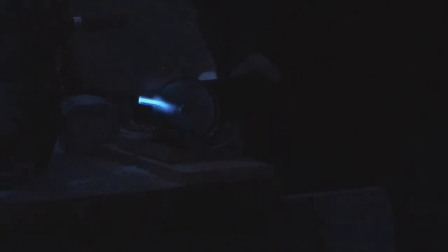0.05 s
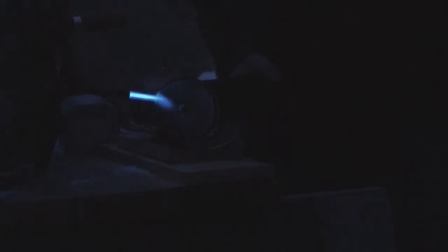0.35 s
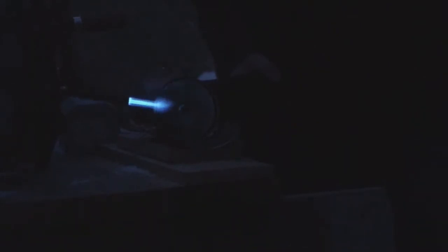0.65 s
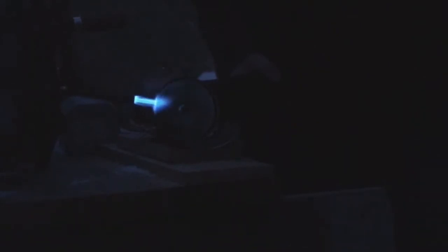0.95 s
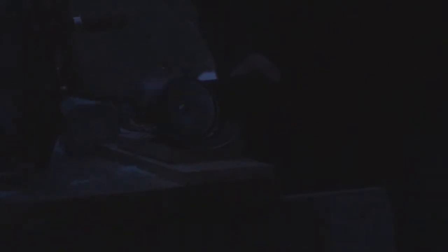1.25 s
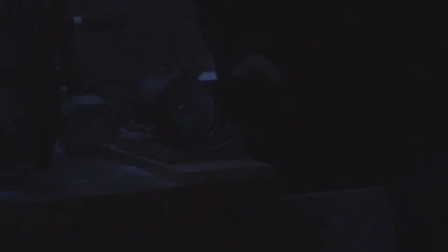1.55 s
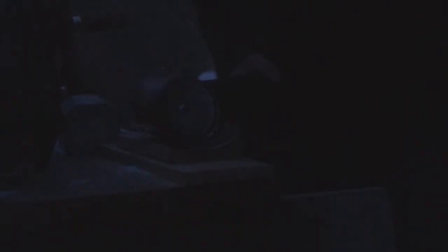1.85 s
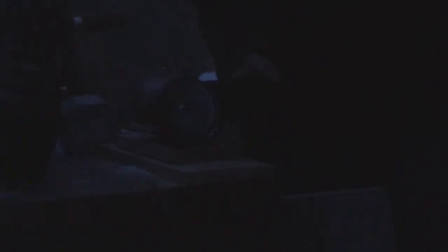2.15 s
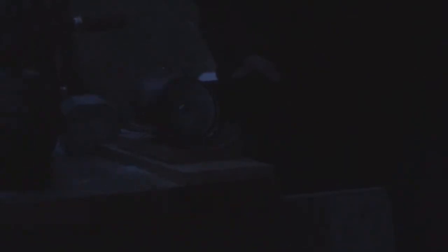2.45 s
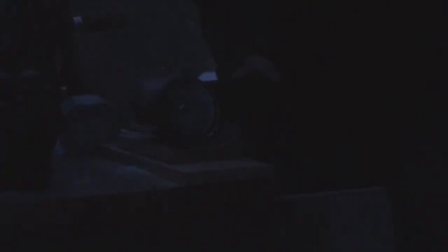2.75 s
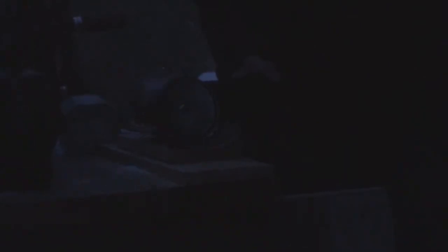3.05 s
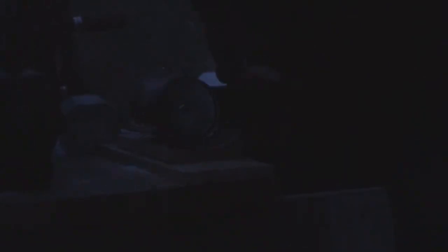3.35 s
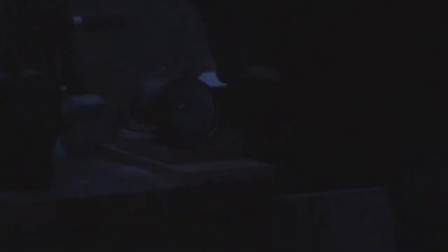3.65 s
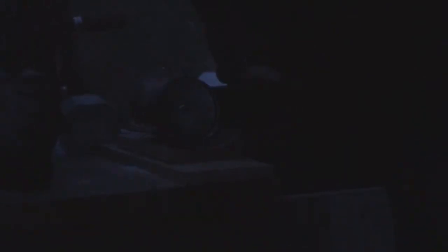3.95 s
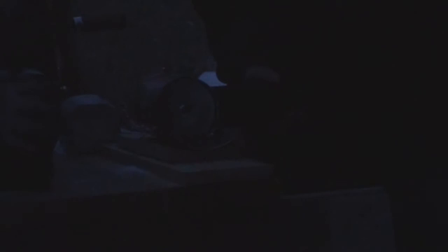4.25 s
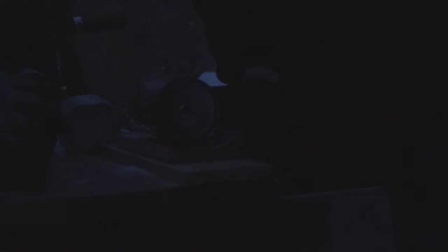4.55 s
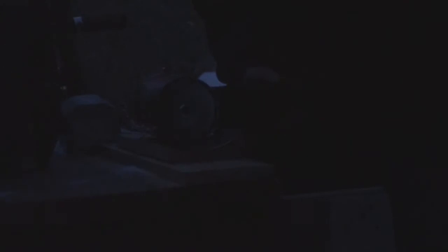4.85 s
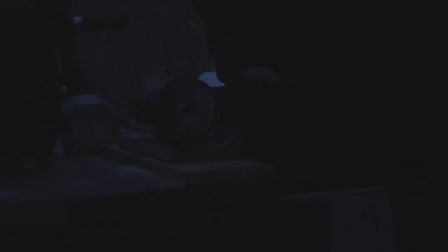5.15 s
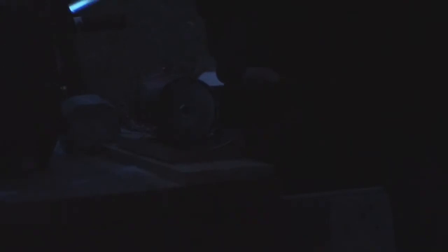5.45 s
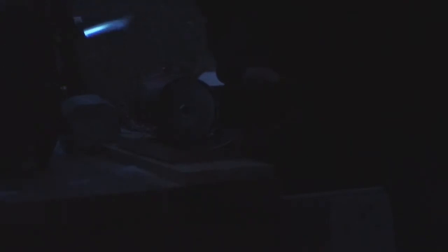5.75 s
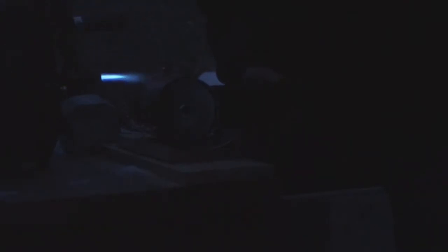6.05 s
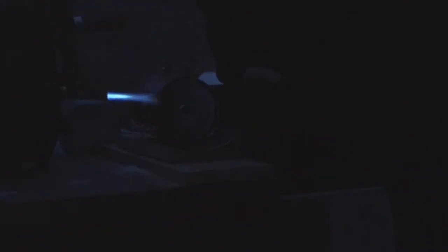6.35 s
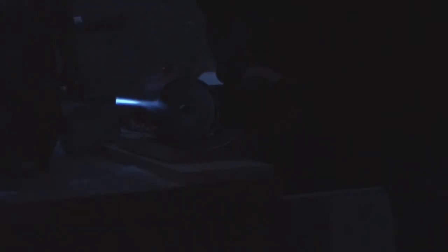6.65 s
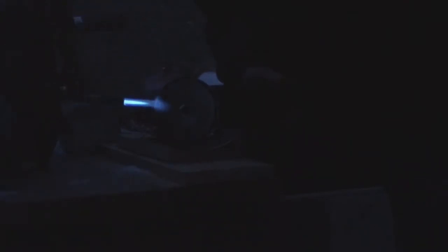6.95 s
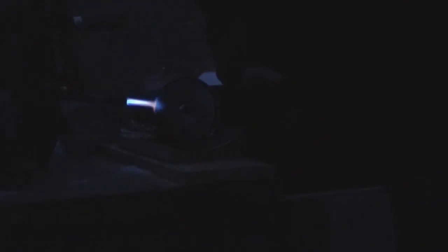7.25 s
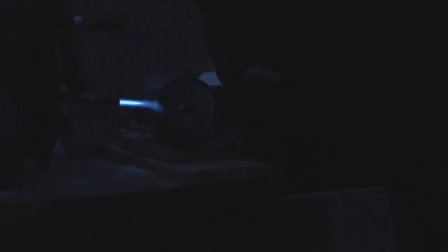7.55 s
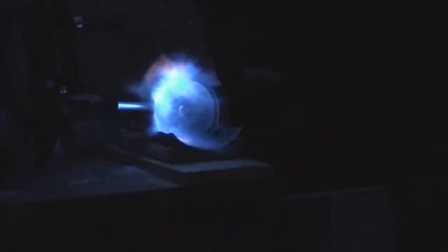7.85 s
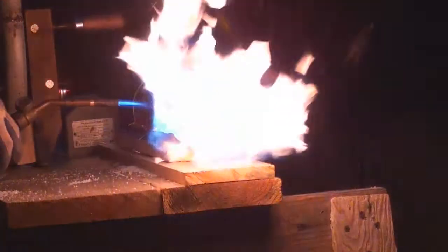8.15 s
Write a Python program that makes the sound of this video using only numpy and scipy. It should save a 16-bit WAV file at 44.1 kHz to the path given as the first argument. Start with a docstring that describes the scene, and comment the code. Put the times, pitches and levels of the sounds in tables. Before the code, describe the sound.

An electric blower whines up three times, driving a loud rush of air over hissing gas and a blowtorch, ending in a low fireball puff.

```python
"""A fuel gas jet hisses and whistles over a burning blowtorch: a homemade turbine in a small workshop.
An electric blower runs up three times, whining and driving air through resonant ducts and the combustor.
In the lull after the first run the gas valve shuts and metal is knocked, once sharply. The gas flows
again with a short hoot; at the end it catches in a fireball. The torch burns throughout."""
import sys
import numpy as np
from scipy import signal
from scipy.fft import rfft, irfft
from scipy.io import wavfile
from scipy.ndimage import uniform_filter1d

SR = 44100
rng = np.random.default_rng(int(sys.argv[2]) if len(sys.argv) > 2 else 0)


def master_out(mix):
    """Clip the mix to full scale and print it as 16-bit PCM to the path in sys.argv[1]."""
    frames = np.transpose(np.atleast_2d(mix))
    ceiling = np.clip(frames, -1, 1)
    pcm = np.round(ceiling * 32767).astype(np.int16)
    wavfile.write(sys.argv[1], SR, pcm)


N = 362061
T = np.arange(N) / SR
F = np.maximum(np.arange(N // 2 + 1) * SR / N, 1)
START_HZ, FULL_SPEED_HZ = 134, 218  # shaft rates


def undb(db):
    """Decibels to gain."""
    return 10 ** (np.asarray(db) / 20)


def unit(x):
    """Scale to rms 1."""
    return x / np.sqrt(np.mean(x ** 2))


def ramp(start_s, length_s):
    """Linear rise from 0 to 1."""
    return np.clip((T - start_s) / length_s, 0, 1)


def bump(peak_s, half_s):
    """Gaussian envelope, peak 1."""
    return np.exp(-((T - peak_s) / half_s) ** 2)


def bell(x, centre, width):
    """Resonance curve, peak 1, full width at half height."""
    return 1 / (1 + (2 * (x - centre) / width) ** 2)


def spectrum_db(points):
    """Breakpoints interpolated over log frequency."""
    hz, db = np.transpose(points)
    return np.interp(np.log(F), np.log(hz), db)


def resonance_db(resonances):
    """Summed lift of resonances at every frequency."""
    return sum(db * bell(F, hz, width_hz) for hz, width_hz, db in resonances)


def colour(x, db):
    """Filter by a gain at every frequency."""
    return irfft(rfft(x) * undb(db), N)


def band_noise(hz, width_hz):
    """Noise through one resonance, rms 1."""
    return unit(colour(rng.standard_normal(N), 20 * np.log10(bell(F, hz, width_hz))))


def walk(rate_hz):
    """Smooth random drift, rms 1."""
    hold = max(int(SR / rate_hz), 1)
    steps = np.repeat(rng.standard_normal(N // hold + 1), hold)
    return unit(uniform_filter1d(uniform_filter1d(steps, hold), hold)[:N])


def eddies(shape_db, flutter_db, grit_db):
    """Turbulence, rms 1: slow flutter and millisecond grit move all bands together."""
    bursts = undb(flutter_db * (walk(14) + walk(60)) + grit_db * walk(900))
    return unit(colour(rng.standard_normal(N) * bursts, shape_db))


def tone(hz, rough, shake_hz=70):
    """A partial of rms 1, its strength and phase shaken by the flow."""
    shake = 1 + rough * (walk(shake_hz) + 1j * walk(shake_hz))
    return unit(np.real(shake * np.exp(2j * np.pi * np.cumsum(hz) / SR)))


# blower runs (on [s], off [s], air trim at switch-off [dB], hiss lift and body cut at switch-off [dB])
BLOWER_RUNS = [(.452, 1.899, 1.0, -0.44), (4.892, 5.968, 1, 0.4), (6.799, 7.469, 0.86, -0.5)]


def shaft_rate(limit_hz=223.5, run_up_s=.325, drag_turns=242, friction_hz=55):
    """Constant power fills the rotor with energy against drag; switched off, air and bearings brake it."""
    def coast(hz, t):
        return friction_hz * np.tan(np.arctan(hz / friction_hz) - t * friction_hz / drag_turns)
    shaft_hz = coast(START_HZ, np.minimum(T, BLOWER_RUNS[0][0]))
    for on_s, off_s, _, _ in BLOWER_RUNS:
        on, off = int(on_s * SR), int(off_s * SR)
        energy_gap = (limit_hz ** 2 - shaft_hz[on] ** 2) * np.exp(-T[:N - on] / run_up_s)
        shaft_hz[on:] = np.sqrt(limit_hz ** 2 - energy_gap)
        shaft_hz[off:] = coast(shaft_hz[off], T[:N - off])
    return shaft_hz


# air stream spectrum (frequency [Hz], level [dB])
AIR_SPECTRUM = [(30, -47), (60, -26), (130, -23), (300, -15.5), (500, -6.5), (1100, -7), (2000, -4),
                (3600, -3), (5500, 0.5), (7500, -5), (10000, -7), (12000, -15), (14000, -22.5),
                (16000, -23.0)]
# duct and combustor resonances (frequency [Hz], width [Hz], lift [dB])
DUCT_MODES = [(178, 41, 7.5), (273, 100, 8.5), (385, 18, 4.5), (518, 103, 3.1), (626.5, 69, 9),
              (752, 96, 8), (835, 50, 4.5), (928, 118, 10.5), (1050, 77, 5.5), (1227, 100, 7),
              (1341, 45, 5), (1388, 156, 7), (1580, 300, 6.5), (1914, 200, 7.5), (2070, 53, 3),
              (2126, 158, 8.5), (2593, 335, 5.5), (2783, 205, 3.5), (3300, 89, 4), (6600, 1300, 1.8)]


def air_stream(shaft_hz, level_db=-27.5, db_per_decade=58):
    """Duct rush grows with about the sixth power of blower speed, the hiss faster than the body."""
    _, off_s, trims_db, tilts_db = np.transpose(BLOWER_RUNS)
    trim_db, tilt_db = np.interp(T, off_s, trims_db), np.interp(T, off_s, tilts_db)
    decades = np.log10(shaft_hz / FULL_SPEED_HZ)
    rush = eddies(spectrum_db(AIR_SPECTRUM) + resonance_db(DUCT_MODES), flutter_db=.07, grit_db=.23)
    hiss = signal.sosfilt(signal.butter(1, 3000, "high", fs=SR, output="sos"), rush)
    body = rush - hiss
    stream = body * undb(-6 * decades - tilt_db) + hiss * undb(14 * decades + tilt_db)
    return stream * undb(level_db + db_per_decade * decades + trim_db)


# fan housing resonances (frequency [Hz], width [Hz], lift [dB])
HOUSING_MODES = [(1320, 70, 5), (1620, 100, 6.5), (1785, 40, 6.5), (1950, 60, 10.5), (2172, 40, 5.5)]
# unbalance and blade overtones (order [x shaft rate], level at full speed [dB])
FAN_ORDERS = [(1, -53.5), (20, -60), (60, -63)]


def blower(shaft_hz, blades=10, blade_db=-45.5, cut_on_hz=1390, overtone_db_per_decade=62):
    """The blade note flares at each housing resonance and dies below the duct's cut-on."""
    blade_hz = blades * shaft_hz
    housing = undb(np.interp(blade_hz, F, resonance_db(HOUSING_MODES)))
    escape = 1 / np.sqrt(1 + (cut_on_hz / blade_hz) ** 20)
    note = tone(blade_hz, rough=.36, shake_hz=45) * undb(blade_db) * housing * escape
    overtones = sum(undb(db) * tone(order * shaft_hz, rough=.34) for order, db in FAN_ORDERS)
    return note + overtones * undb(overtone_db_per_decade * np.log10(shaft_hz / FULL_SPEED_HZ))


# motor tones (order [x shaft rate], casing resonance [Hz], width [Hz], peak level [dB])
MOTOR_ORDERS = [(12, 2080, 280, -37), (24, 2250, 400, -45.5), (24, 3080, 350, -44.5)]


def motor(shaft_hz, full_pull_hz_per_s=170):
    """The armature rasps under power, each tone heard where it crosses a casing resonance."""
    acceleration = uniform_filter1d(np.gradient(shaft_hz) * SR, size=1500)
    pull = np.clip(acceleration / full_pull_hz_per_s, 0, 1)
    rasp = 0
    for order, casing_hz, width_hz, db in MOTOR_ORDERS:
        hz = order * shaft_hz
        rasp += undb(db) * tone(hz, rough=2.1, shake_hz=190.8) * bell(hz, casing_hz, width_hz)
    return rasp * pull


# gas jet spectrum (frequency [Hz], level [dB])
GAS_SPECTRUM = [(30, -17), (60, -2.5), (110, -13.5), (300, -7), (550, 1.5), (1100, -6), (2600, -2.5),
                (3200, -3), (4500, -3), (6000, -4), (10000, -10), (13000, -19), (16000, -29.0)]
# fuel valve (opens [s], shuts [s], opening time [s], flow [dB], whistle trim on opening [dB])
FUEL_VALVE = [(-.5, 3.343, .1, -1.0, 1), (3.352, 3.395, .01, -16, -10), (4.84, 8.5, .13, -2.5, -7)]


def gas_jet(shaft_hz, hiss_db=-39, draught_db_per_decade=5, whistle_db=-50, growth_db_per_s=.5):
    """Gas hisses into the combustor, louder in a strong draught; its nozzle gives a breathy whistle."""
    flow, whistle_drive = 0, 0
    for open_s, shut_s, opening_s, flow_db, trim_db in FUEL_VALVE:
        valve = ramp(open_s, opening_s) * (1 - ramp(shut_s, .0055))
        flow += valve * undb(flow_db)
        whistle_drive += valve * undb(flow_db + trim_db + growth_db_per_s * (T - open_s))
    throat_db = 3 * bell(F, 630, 50)
    shape_db = spectrum_db(GAS_SPECTRUM) + resonance_db(DUCT_MODES) + throat_db
    hiss = flow * eddies(shape_db, flutter_db=.64, grit_db=1.5)
    whistle = whistle_drive * band_noise(4735, width_hz=100) * undb(walk(25.1))
    draught_db = draught_db_per_decade * np.log10(shaft_hz / START_HZ)
    return hiss * undb(hiss_db + draught_db) + whistle * undb(whistle_db)


# fireball spectrum (frequency [Hz], level [dB])
FIRE_SPECTRUM = [(25, -20), (55, -6), (105, -5.5), (160, 6), (210, -1), (290, -8.5), (380, -4.5), (600, -8),
                 (900, -27), (2000, -44), (8000, -45)]
# fireball flares (time [s], relative level [dB])
FIRE_FLARES = [(7.975, -3), (8.088, -4), (8.17, -10), (8.205, -13)]


def fireball(level_db=-38, ignition_s=7.948, spread_s=.035, puff_s=3.32, puff_db=-49):
    """Flame billows in low, uneven puffs: softly as the valve shuts, fully when the gas catches."""
    billow = eddies(spectrum_db(FIRE_SPECTRUM), flutter_db=.8, grit_db=.2)
    burn = undb(-1) * ramp(ignition_s, spread_s)
    flares = sum(undb(db) * bump(peak_s, half_s=.02) for peak_s, db in FIRE_FLARES)
    puff = band_noise(110, width_hz=140) * bump(puff_s, half_s=.037)
    return billow * (burn + flares) * undb(level_db) + puff * undb(puff_db)


# knocks on the metalwork (time [s], relative level [dB])
KNOCK_HITS = [(3.387, -21), (3.995, -14.5), (4.1958, -10), (4.1995, -1), (4.647, -17)]
# metalwork modes (frequency [Hz], relative level [dB], t60 [s])
METAL_MODES = [(1090, -7, 0.14), (1420, -2, .06), (1624, 7, 0.047), (2090, -5, .1), (2580, -8, 0.067),
               (3300, -12, .05), (4100, -10, 0.04), (4800, -9, .1), (5200, -4, 0.047), (5350, -4, 0.06),
               (7620, -6, .07)]


def knocks(ring_db=-36, crack_db=-35, crack_s=.0029, scatter_db=-45, scatter_s=.032, detune=.0043):
    """Each knock is a short crack, the ring of the metal and a little scatter from the walls."""
    out, t = np.zeros(N), T[:SR // 2]
    band = signal.butter(2, [1000, 6500], "band", fs=SR, output="sos")
    for hit_s, hit_db in KNOCK_HITS:
        ring = 0
        for hz, mode_db, t60_s in METAL_MODES:
            detuned_hz = hz * (1 + detune * rng.standard_normal())
            ring += undb(mode_db - 60 * t / t60_s) * np.sin(2 * np.pi * detuned_hz * t)
        fade = undb(crack_db) * np.exp(-t / crack_s) + undb(scatter_db) * np.exp(-t / scatter_s)
        crack = fade * unit(signal.sosfilt(band, rng.standard_normal(len(t))))
        i = int(hit_s * SR)
        out[i:i + len(t)] += undb(hit_db) * (undb(ring_db) * ring + crack)
    return out


def start_hoot(start_s=4.842, peak_s=4.872, end_s=4.888, level_db=-35.5):
    """A short, rough, rising hoot as the rig starts up after the lull."""
    hz = np.interp(T, [start_s, end_s], [680, 735])
    swell = undb(level_db) * bell(T, peak_s, width=.034)
    gate = ramp(start_s, .0079) * (1 - ramp(end_s + .007, .018))
    return tone(hz, rough=.5, shake_hz=260) * swell * gate


def combustor_drone(shaft_hz, level_db=-47, db_per_decade=90, swell_db=-48):
    """Strong draught blows a combustor pipe mode into a wavering note; it also swells at the start."""
    draught = undb(level_db + db_per_decade * np.log10(shaft_hz / FULL_SPEED_HZ))
    swell = undb(swell_db) * bump(peak_s=.16, half_s=.14)
    return band_noise(630, width_hz=20) * (draught + swell)


# torch flame spectrum (frequency [Hz], level [dB])
TORCH_SPECTRUM = [(30, -17), (60, -6), (130, 2), (350, -1), (700, -4.5), (1500, -8.5), (2700, -4),
                  (3100, -12), (5000, -14), (6800, -8.5), (8000, -16), (11000, -15), (13000, -26),
                  (16000, -26)]
# burner tube resonances (frequency [Hz], width [Hz], lift [dB])
TUBE_MODES = [(587, 81, 11.4), (760, 125, 4.8), (850, 95, 7.8), (1037, 120, 9.5), (1267, 97, 11),
              (1470, 175, 12), (1737, 23, 12), (2020, 230, 7.8), (2410, 115, 5.0), (2650, 68, 4.4),
              (4720, 310, 8.9), (5940, 340, 10), (11000, 168, 4.7)]


def blowtorch(level_db=-48):
    """A turbulent flame burns steadily in its resonant tube."""
    shape_db = spectrum_db(TORCH_SPECTRUM) + resonance_db(TUBE_MODES)
    return undb(level_db) * eddies(shape_db, flutter_db=.7, grit_db=1.1)


def reflections(x, t60_s=.2, delay_s=.003):
    """Diffuse workshop echo at unit power gain."""
    t = T[:SR // 2]
    response = rng.standard_normal(len(t)) * undb(-60 * t / t60_s) * (t > delay_s)
    return signal.fftconvolve(x, response / np.linalg.norm(response))[:N]


# wall echo in the stereo side signal (frequency [Hz], relative level [dB])
SIDE_SPECTRUM = [(60, -14), (130, -17.5), (380, -11), (700, -14), (1290, -16), (2380, -12.5), (4400, -12.5),
                 (8120, -17.5), (15000, -59)]


def workshop(rig, echo_db=-16, side_db=-2.5, lean_right_db=.2):
    """All sources stand close together ahead; the walls give the little width there is."""
    mid = rig + undb(echo_db) * reflections(rig)
    side = colour(reflections(rig), spectrum_db(SIDE_SPECTRUM) + side_db)
    return np.array([(mid + side) * undb(lean_right_db * -.5), (mid - side) * undb(lean_right_db * .5)])


def scene(dip_s=3.35, dip_db=-12):
    """The rig in its workshop; the whole sound dips for an instant at 3.35 s."""
    shaft_hz = shaft_rate()
    air = air_stream(shaft_hz) + blower(shaft_hz) + motor(shaft_hz)
    hoots = start_hoot() + combustor_drone(shaft_hz)
    fuel = gas_jet(shaft_hz) + blowtorch() + fireball()
    return workshop(air + hoots + fuel + knocks()) * undb(dip_db * bump(dip_s, half_s=.003))


def record(dry, top_hz=15850):
    """Steep low-pass on the top treble."""
    return signal.sosfilt(signal.ellip(12, .1, 80, top_hz, fs=SR, output="sos"), dry)


dry = scene()
out = record(dry)
master_out(out)
```